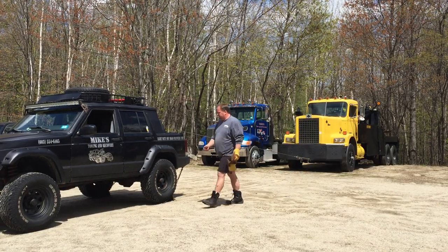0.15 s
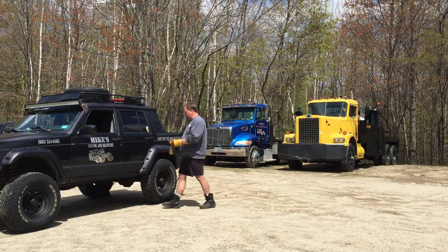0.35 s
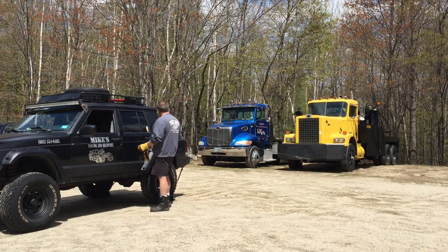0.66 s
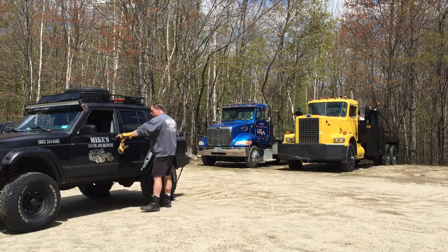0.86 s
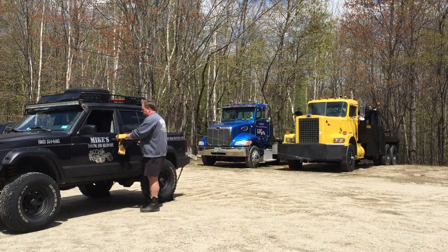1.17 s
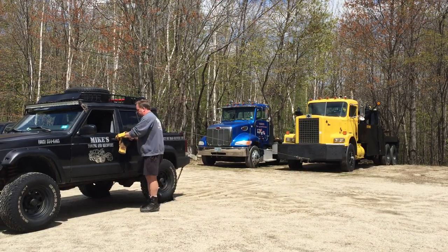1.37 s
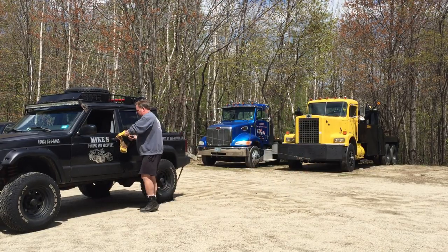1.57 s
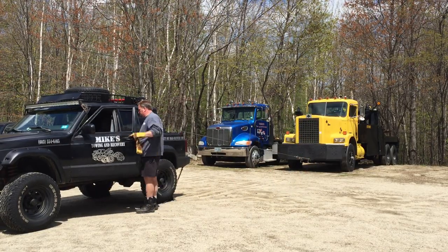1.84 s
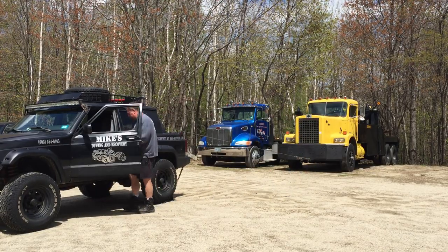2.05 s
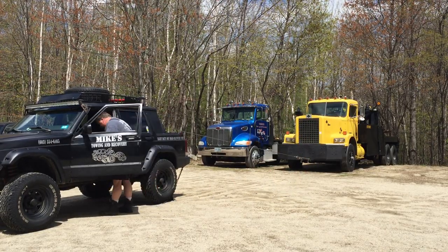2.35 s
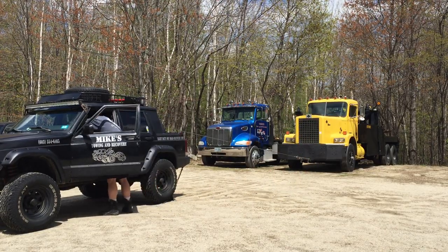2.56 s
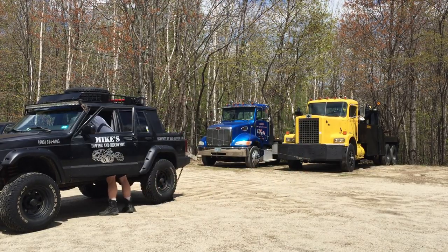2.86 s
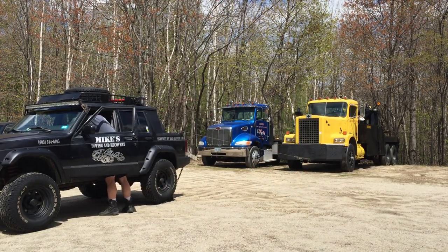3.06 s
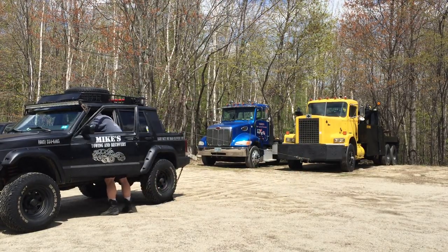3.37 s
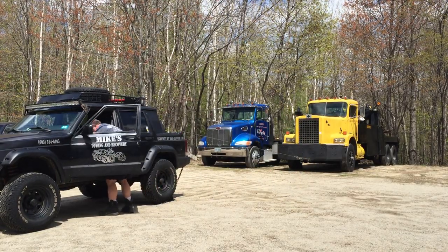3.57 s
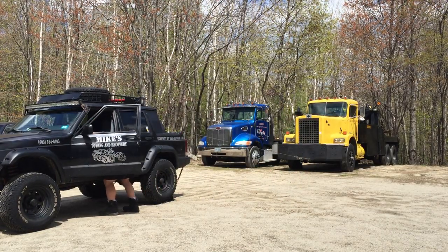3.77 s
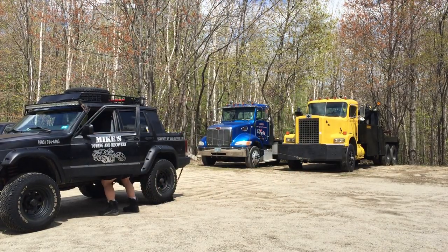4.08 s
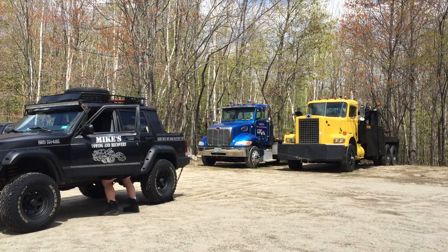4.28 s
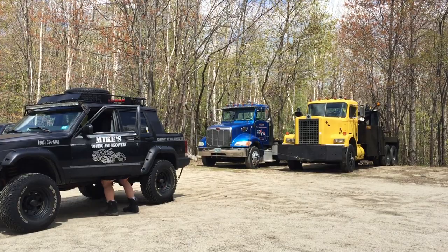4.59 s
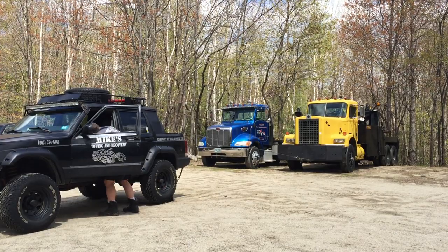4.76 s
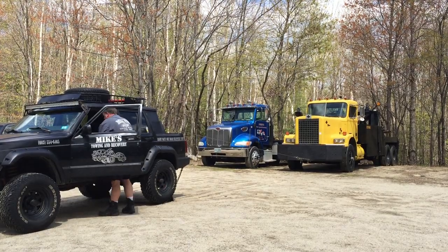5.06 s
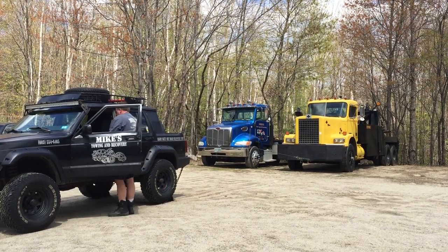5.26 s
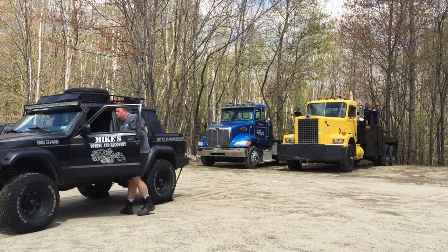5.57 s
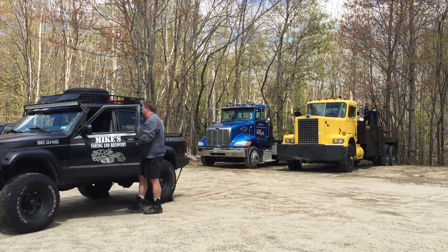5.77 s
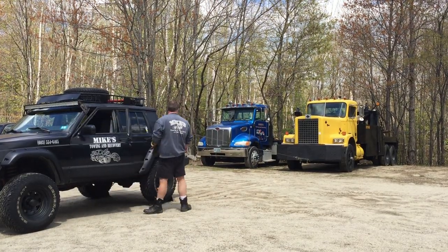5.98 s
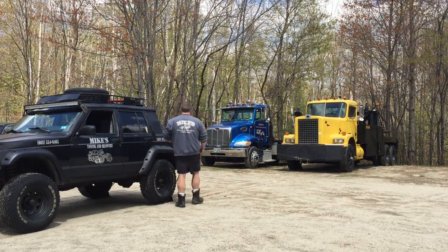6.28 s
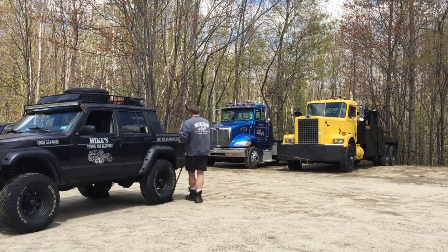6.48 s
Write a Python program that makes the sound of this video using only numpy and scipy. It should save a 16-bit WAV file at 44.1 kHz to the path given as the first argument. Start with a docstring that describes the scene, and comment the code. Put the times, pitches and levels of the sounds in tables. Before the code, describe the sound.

Diesel trucks idle and clatter outdoors, with faint boot scuffs on gravel, a door latch clicking, a wind gust and a car door slam.

```python
"""Two diesel trucks idle in an open gravel yard, their deep exhaust hums beating against each other
under combustion clatter, valve ticks and a thin fan tone. A man's boots scuff the gravel, and at 1.7 s
he unlatches a car door: a few quick clicks that ring its panel. More faint scuffs follow.
From about 4.5 s a gust of wind buffets the microphone with low thumps.
At 6.15 s the door slams shut with a crack and a short boom, and the trucks idle on."""
import sys
import numpy as np
from scipy import signal
from scipy.fft import rfft, irfft
from scipy.io import wavfile
from scipy.ndimage import uniform_filter1d

SR = 44100
rng = np.random.default_rng(int(sys.argv[2]) if len(sys.argv) > 2 else 0)


def unload_audio(sound):
    """Save the sound as a 16-bit wav file, at the path given as the first command line argument."""
    columns = np.transpose(np.atleast_2d(sound))
    # keep every value between -1 and 1, then stretch to whole-number steps
    steps = np.round(np.clip(columns, -1, 1) * 32767)
    wavfile.write(sys.argv[1], SR, steps.astype(np.int16))


N = 292383
TIME = np.arange(N) / SR


def undb(db):
    """Decibels to gain."""
    return 10 ** (np.asarray(db) / 20)


def unit(x):
    """Scale to rms 1."""
    return x / np.sqrt(np.mean(x ** 2))


def curve(rows):
    """Automation lane: straight lines between (t/s, value) breakpoints."""
    return np.interp(TIME, *np.transpose(rows))


def noise():
    """White noise."""
    return rng.standard_normal(N)


def colour(x, points, size=8192):
    """Minimum-phase EQ through (f/Hz, level/dB) points."""
    hz, db = np.transpose(points)
    bins = np.maximum(np.fft.rfftfreq(size, 1 / SR), 1)
    gain = undb(np.interp(np.log(bins), np.log(hz), db))
    cepstrum = irfft(np.log(gain))
    cepstrum[1:size // 2] *= 2
    cepstrum[size // 2 + 1:] = 0
    return signal.fftconvolve(x, irfft(np.exp(rfft(cepstrum))))[:N]


def resonate(x, hz, *widths_hz):
    """Band-passes in series, one per width, with gain 1 at the centre."""
    for width in widths_hz:
        x = signal.lfilter(*signal.iirpeak(hz, hz / width, fs=SR), x)
    return x


def drift(rate_hz):
    """Smooth random modulation, rms 1."""
    hold = int(SR / rate_hz)
    steps = np.repeat(rng.standard_normal(N // hold + 1), hold)[:N]
    return unit(uniform_filter1d(uniform_filter1d(steps, hold), hold))


def bursts(cycles, decay_cycles, scatter_db):
    """A decay envelope retriggered once a cycle, each time at a random height."""
    count = np.floor(cycles).astype(int)
    heights = undb(scatter_db * rng.standard_normal(count.max() + 1))
    return unit(heights[count] * np.exp(-(cycles - count) / decay_cycles))


def fan(blade_hz=326.4, level_db=-52):
    """The cooling fan's blades add a thin, wavering tone."""
    hz = blade_hz * (1 + .009 * drift(3) + .007 * drift(30))
    return undb(level_db + 2.1 * drift(16)) * np.sin(2 * np.pi * np.cumsum(hz) / SR)


# bright ring of the valve gear: f/Hz, width/Hz, relative level/dB
VALVE_RING = [(3300, 530, 9), (4410, 47, 9), (6200, 320, 2.5)]
def valves(firings, level_db=-62):
    """A loose, bright tick once a shaft turn, which is three firings of the six cylinders."""
    ticks = noise() * bursts(firings / 3, decay_cycles=.13, scatter_db=1.8)
    ring = sum(undb(db) * resonate(ticks, hz, width, 3 * width) for hz, width, db in VALVE_RING)
    return undb(level_db) * unit(ring)


# fader ride of the engine clatter: t/s, level/dB
CLATTER_FADER = [(0, -46.5), (1.2, -47), (3.2, -47), (3.75, -47), (4.45, -46.5), (4.85, -46), (5.4, -49),
                 (6.63, -47)]
# mid-forward tone of the engine block: f/Hz, relative level/dB
BLOCK_EQ = [(300, -2.5), (700, -0.5), (1050, 4), (1500, 4.5), (2200, -2), (3500, -4), (4000, -9.5),
            (5000, -15), (6500, -16), (7500, -21.5), (9400, -22.5), (10400, -30), (11500, -27.5),
            (16000, -35.5)]
# metallic ring of block and covers: f/Hz, width/Hz, relative level/dB
COVER_RING = [(1325, 18, 9), (1898, 85, 3.5), (2425, 49, 2), (3176, 26, 2.5), (3270, 23, -2),
              (3450, 200, -4), (4394, 46, -7)]
def clatter(firings):
    """Each firing knocks the block and rings its covers; fan hiss fills the gaps."""
    knocks = noise() * bursts(firings, decay_cycles=.25, scatter_db=2.5)
    # a fast, faint flutter in the clatter, at three times the firing rate
    flutter = noise() * bursts(firings * 3, decay_cycles=.35, scatter_db=1.5)
    drive = undb(-12) * knocks + undb(-6) * flutter + noise()
    ring = sum(undb(db) * resonate(knocks + noise(), hz, width, 8 * width)
               for hz, width, db in COVER_RING)
    body = unit(colour(drive, BLOCK_EQ)) + undb(-8) * unit(ring)
    return unit(body) * undb(curve(CLATTER_FADER) + .5 * drift(14))


# partials of an exhaust pipe: multiple of the firing rate, relative level/dB
PIPE_PARTIALS = [(1, -28), (2, 1), (3, -22.5), (4, -27)]
def pipe(firings, waver_db=.6):
    """One exhaust pipe hums, a little unsteadily, strongest at twice its firing rate."""
    tone = sum(undb(db) * np.sin(2 * np.pi * k * firings) for k, db in PIPE_PARTIALS)
    return unit(tone) * undb(waver_db * drift(20))


# both governors hunt, detuning the second truck's hum against the first: t/s, offset f/Hz
HUM_DETUNE = [(0.0, 2.29), (0.46, 1.81), (1.04, 3.34), (1.29, -0.3), (2.38, 2.96), (2.79, 0.39),
              (3.31, -0.29), (3.37, 2.98), (4.29, 0.4), (4.66, 2.47), (5.46, 2.68), (5.86, -0.01),
              (6.63, 1.03)]
# fader ride of the louder truck's hum: t/s, level/dB
HUM_FADER = [(0, -34.5), (2.3, -35), (3.3, -33.5), (4.3, -35.5), (5.4, -38), (6.2, -33)]
# low-end weight of the exhaust gas: f/Hz, relative level/dB
RUMBLE_EQ = [(15, -32), (35, -1), (58, -1), (100, 1.5), (150, 0.5), (210, -4.5), (290, -7.5), (330, -8.5),
             (365, -10.5), (480, -27.5), (900, -35), (4000, -71)]
def exhaust(firings, second_truck_db=-7.5, rumble_db=-42):
    """Two pipes beat as they slip in and out of step, over a rumble of gas puffs."""
    # halved, because the hum is the second partial
    second_firings = firings + np.cumsum(curve(HUM_DETUNE)) / SR / 2
    hum = undb(curve(HUM_FADER)) * (pipe(firings) + undb(second_truck_db) * pipe(second_firings))
    puffs = noise() * (1 + .4 * bursts(firings, decay_cycles=.4, scatter_db=2))
    return hum + undb(rumble_db) * unit(colour(puffs, RUMBLE_EQ))


# boot cues on gravel: t/s, level/dB, length/s, centre f/Hz
BOOT_CUES = [(0.412, -57.5, 0.025, 5000), (0.564, -44, 0.045, 1500), (0.89, -53, 0.03, 1900),
             (2.718, -65, 0.5, 5560), (3.644, -48, 0.11, 1360), (4.78, -62, 0.11, 4000)]
def boots(grains_per_s=1600, grain_s=.0012):
    """Grit crackles under a boot: a shower of tiny grains that swells and fades."""
    out = np.zeros(N)
    for start, db, length, hz in BOOT_CUES:
        triggers = rng.random(N) < grains_per_s / SR
        strengths = undb(3 * np.minimum(rng.exponential(size=N), 4))
        grains = noise() * signal.lfilter([1], [1, -np.exp(-1 / (grain_s * SR))], triggers * strengths)
        grit = resonate(grains, hz, 1.3 * hz, 1.3 * hz)
        age = np.maximum(TIME - start, 0) / length
        swell = 2 * np.sqrt(age) * np.exp(-2 * age ** 2)
        out += undb(db) * unit(grit) * swell
    return out


# a light breeze builds to a gust, drops and surges again at the very end: t/s, level/dB
GUST_FADER = [(0, -40.5), (1.2, -51), (2.1, -44), (3.7, -53.5), (4.15, -41), (5.4, -27), (5.7, -31.5),
              (6.0, -27.5), (6.4, -49), (6.63, -26)]
# bass-heavy tone of the wind: f/Hz, relative level/dB
WIND_EQ = [(15, -29), (40, 3.5), (75, 0.5), (140, -4.5), (220, -14), (330, -30), (600, -40.5), (3000, -80)]
# thumps of strong eddies on the microphone: t/s, peak level/dB, centre f/Hz
EDDY_CUES = [(4.662, -19, 62.3), (4.686, -18, 111), (4.912, -9.5, 92), (5.147, -12.5, 80),
             (5.168, -16, 100), (5.282, -10.5, 77), (5.316, -13, 54), (5.45, -15.5, 78), (5.467, -8, 92),
             (5.54, -13, 192), (5.582, -11.5, 58.3), (5.969, -24, 62), (6.002, -8.5, 83)]
def wind(flutter_db=2, wake_db=-15.5, wake_s=.029, wake_hz=71, width_hz=121):
    """Turbulence rides the gust; each eddy hits the microphone as a soft thump in a ragged wake."""
    out = unit(colour(noise(), WIND_EQ)) * undb(curve(GUST_FADER) + flutter_db * drift(20))
    wake = unit(resonate(noise(), wake_hz, width_hz, width_hz, 2 * width_hz))
    for peak_time, db, hz in EDDY_CUES:
        t = TIME - peak_time
        # one push and pull of pressure, shorter for a smaller eddy
        thump = np.real(np.exp(2j * np.pi * rng.random()) / (1 - 1j * np.pi * hz * t) ** 3)
        out += undb(db) * (thump + undb(wake_db) * wake * np.exp(-(t / wake_s) ** 2))
    return out


# handle and latch, then the slam: t/s, relative level/dB, crack trim/dB, boom trim/dB
DOOR_CUES = [(1.700, -23, -18, -5), (1.767, -19, -14, 9.5), (1.772, -22.5, -5, 11),
             (1.780, -20.5, -10, 5.5), (6.1433, -9, -18, -30), (6.148, -7, 0.5, -1), (6.1514, -8, 4.5, 0),
             (6.1549, -8, 1, 5.5), (6.16, -11.5, -5, 7.5)]
# body of the door, its panel modes: f/Hz, relative level/dB
PANEL_MODES = [(105, -2), (175, 1), (262, 5), (425, -9), (505, -6), (587, 0), (740, -8), (906, 1),
               (1040, -6), (1150, -21), (1298, 0), (1406, -7), (1785, -3), (2020, -1.5), (2420, -6),
               (2806, -11), (3355, -9.5), (4130, -10.5), (5930, -15)]
# tone of the latch crack: f/Hz, relative level/dB
CRACK_EQ = [(150, -1), (600, 2.5), (1200, 0), (1900, -2.5), (3000, -4), (5000, -8), (7500, -11),
            (10500, -23.5), (16000, -28)]
def door(crack_s=.0038, boom_below_hz=550, flex=.0088, yard_s=.038):
    """Latch and frame meet in quick hits; each cracks and rings the panel, and the yard answers."""
    t = TIME[:SR // 2]
    hz, mode_db = np.transpose(PANEL_MODES)[:, :, None]
    t60 = .091 * (hz / 200) ** -.2  # trim and seal damp the panel, its high modes fastest
    decay = np.exp(-np.log(1000) * t / t60)
    attack = 1 - np.exp(-t / .0005)  # the rubber seal softens each onset
    rings, cracks = np.zeros((2, N + len(t)))
    for start, db, crack_db, boom_db in DOOR_CUES:
        span = slice(int(start * SR), int(start * SR) + len(t))
        flexed_hz = hz * (1 + flex * rng.standard_normal(hz.shape))  # each blow detunes the modes
        phase = 2 * np.pi * (flexed_hz * t + rng.random(hz.shape))
        modes = undb(mode_db + boom_db * (hz < boom_below_hz)) * decay * np.sin(phase)
        rings[span] += undb(db) * modes.sum(axis=0) * attack
        snap = rng.standard_normal(len(t)) * np.exp(-t / crack_s)
        cracks[span] += undb(db + crack_db) * snap * attack
    crack = undb(-2.5) * colour(cracks[:N], CRACK_EQ)
    # trees and trucks scatter the crack back as a dull, brief tail
    scatter = resonate(rng.standard_normal(len(t)), 530, 1700) * np.exp(-t / yard_s)
    tail = signal.fftconvolve(crack, scatter / np.linalg.norm(scatter))[:N]
    return undb(-21) * rings[:N] + crack + undb(-18) * tail


# idle speed of the louder truck: t/s, firing rate f/Hz
FIRING_RATE = [(0, 58.09), (1.55, 58.25), (2.9, 57.28), (3.4, 57.64), (4.2, 57.95), (5, 58.03),
               (6.63, 57.21)]
def scene():
    """Mono mix: one firing clock drives hum, clatter and ticks; fan, door, boots and wind join them."""
    firings = np.cumsum(curve(FIRING_RATE) * (1 + .003 * drift(9))) / SR
    engine_bed = exhaust(firings) + clatter(firings) + valves(firings) + fan()
    return (engine_bed + door() + boots() + wind())[None]


def record(dry, top_hz=15750):
    """The phone cuts the top end with a steep low-pass."""
    return signal.sosfilt(signal.ellip(10, .2, 70, top_hz, fs=SR, output="sos"), dry)


dry = scene()
out = record(dry)
unload_audio(out)
```